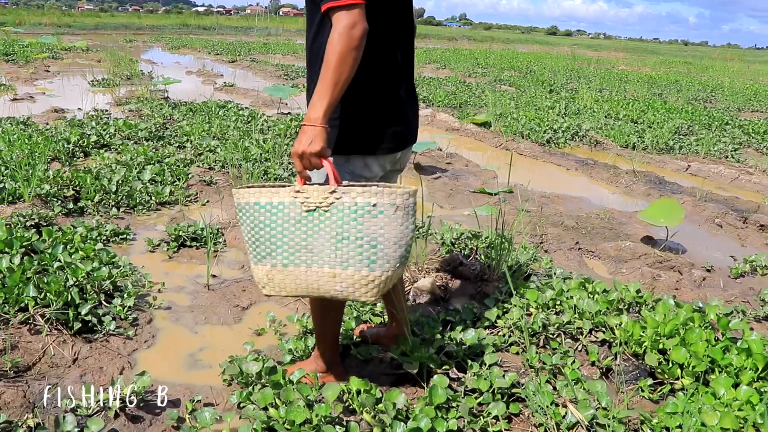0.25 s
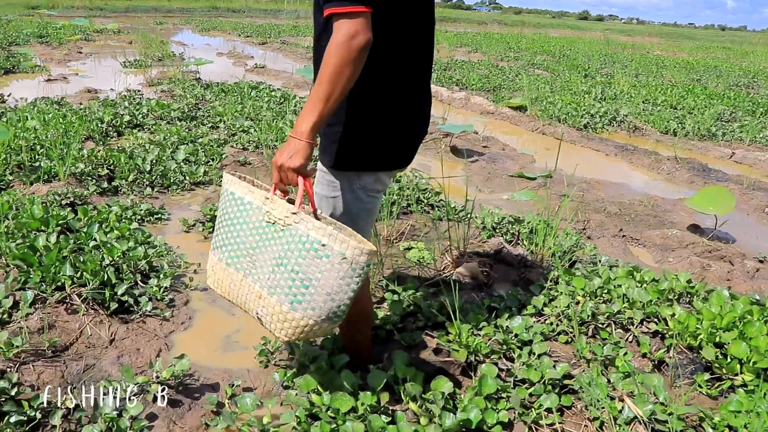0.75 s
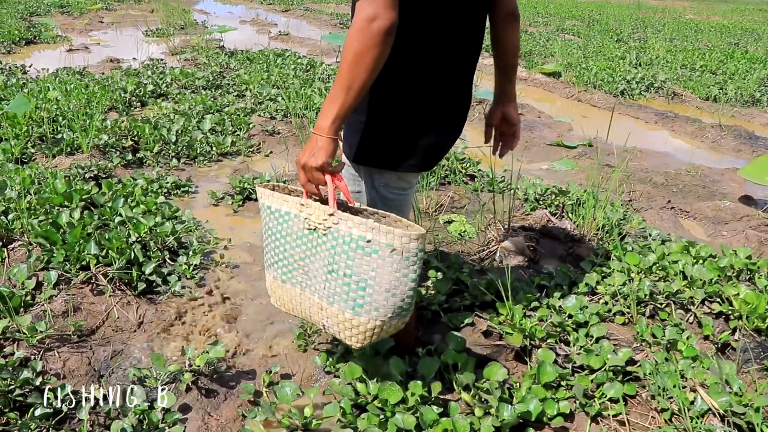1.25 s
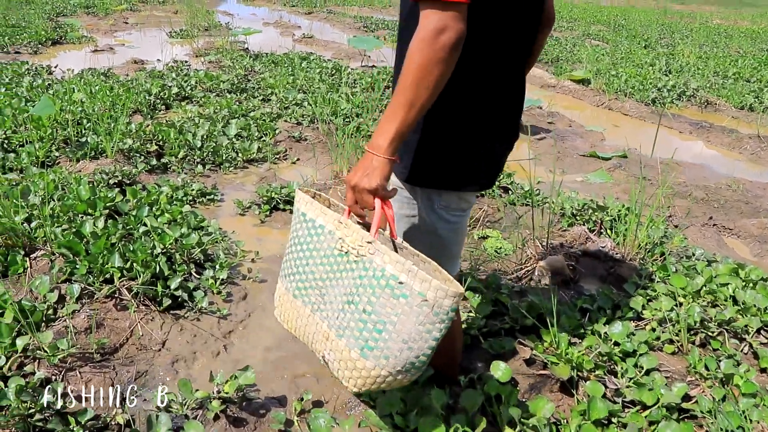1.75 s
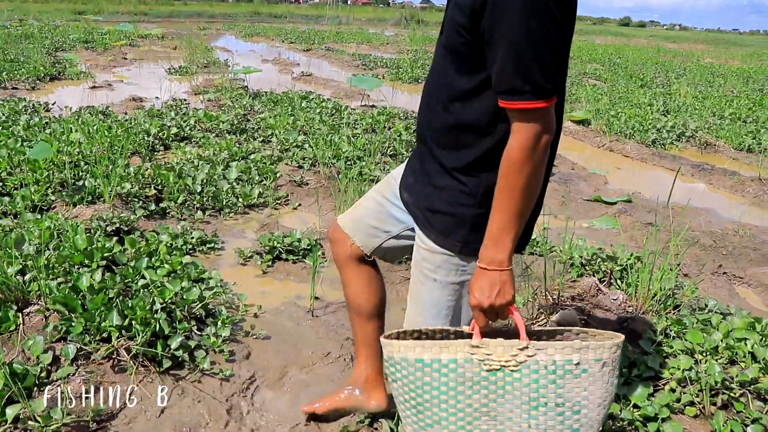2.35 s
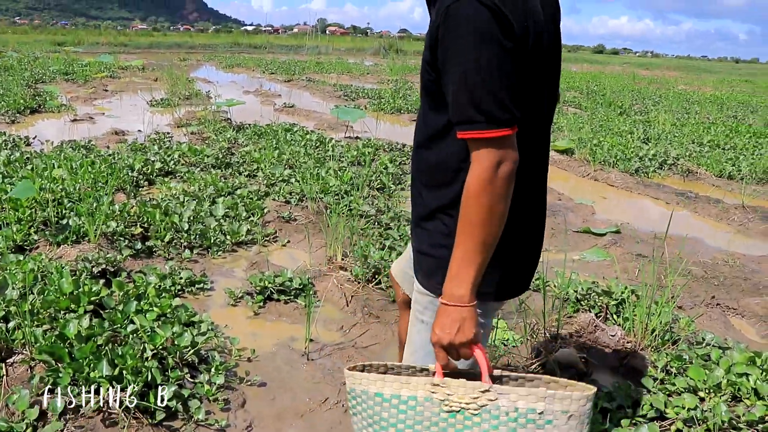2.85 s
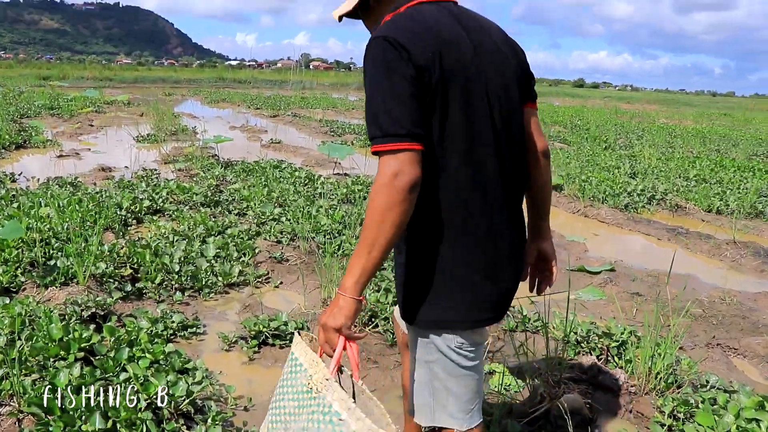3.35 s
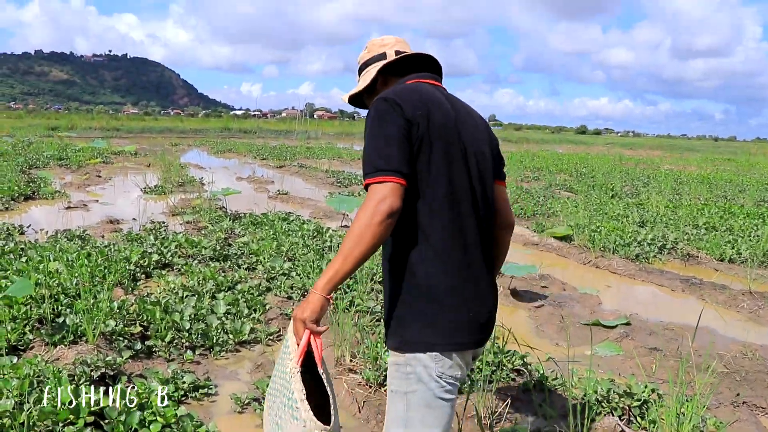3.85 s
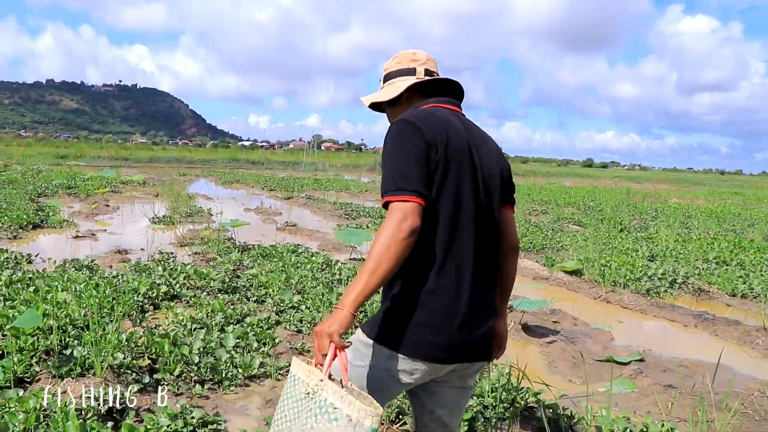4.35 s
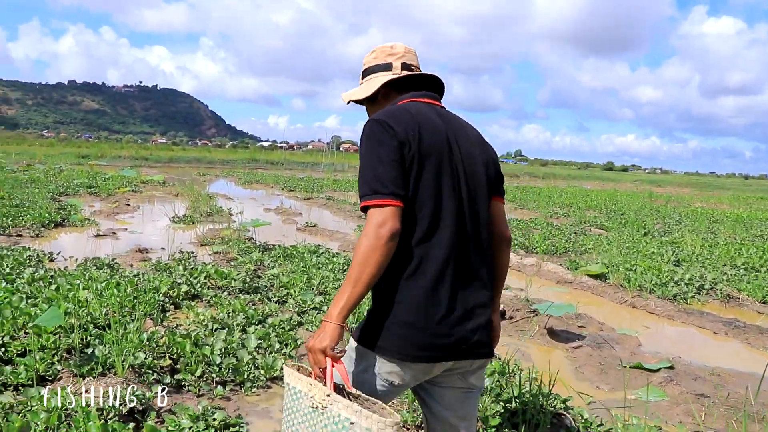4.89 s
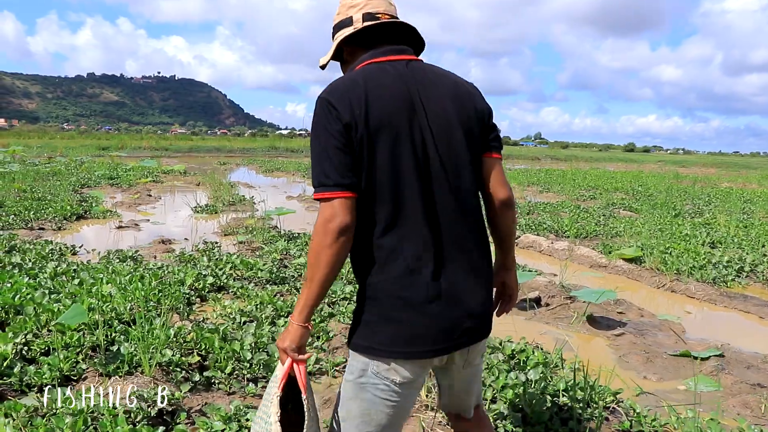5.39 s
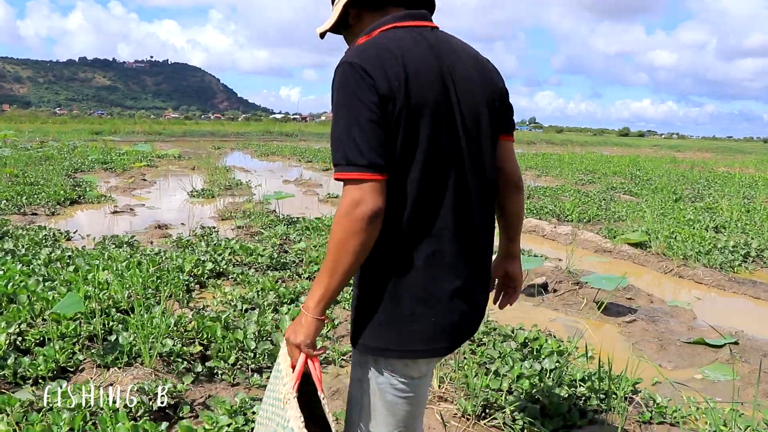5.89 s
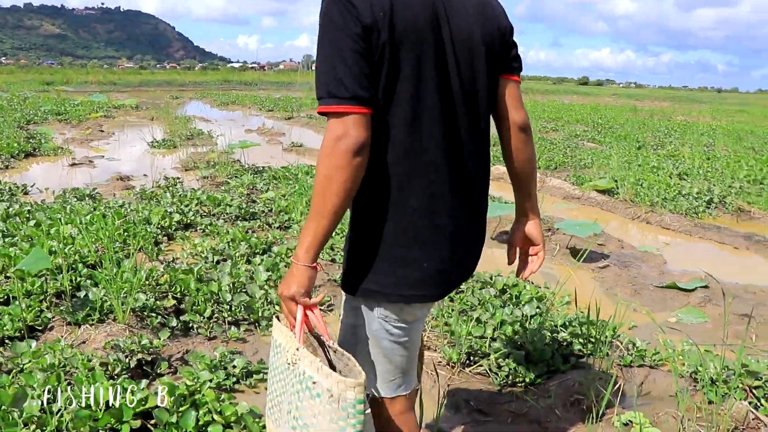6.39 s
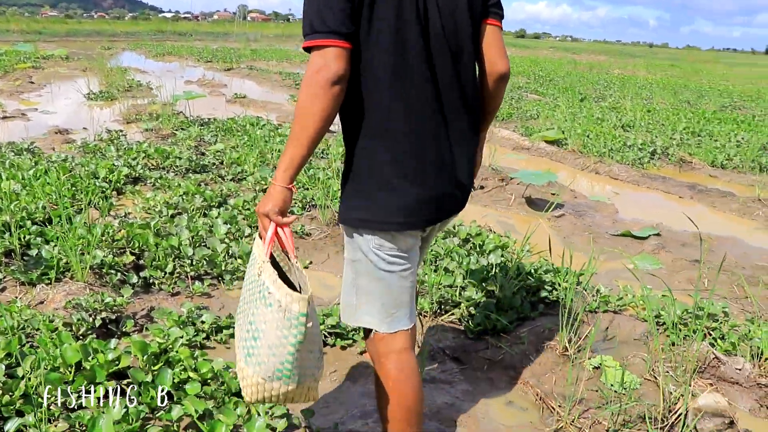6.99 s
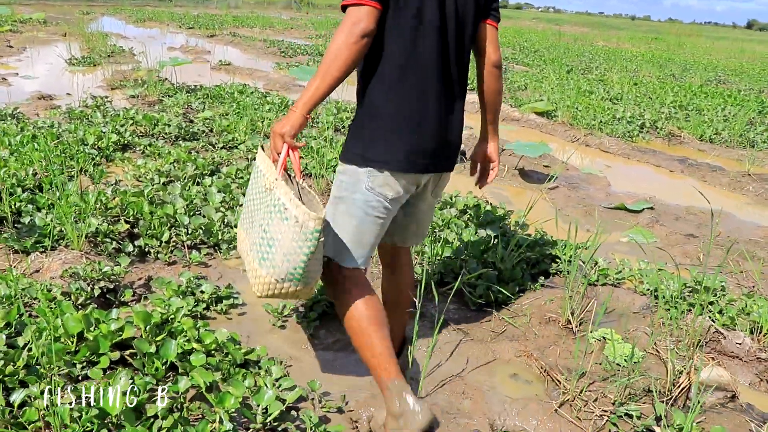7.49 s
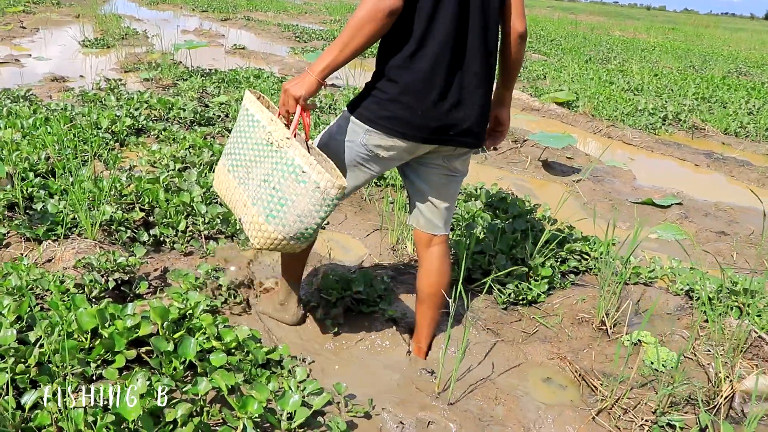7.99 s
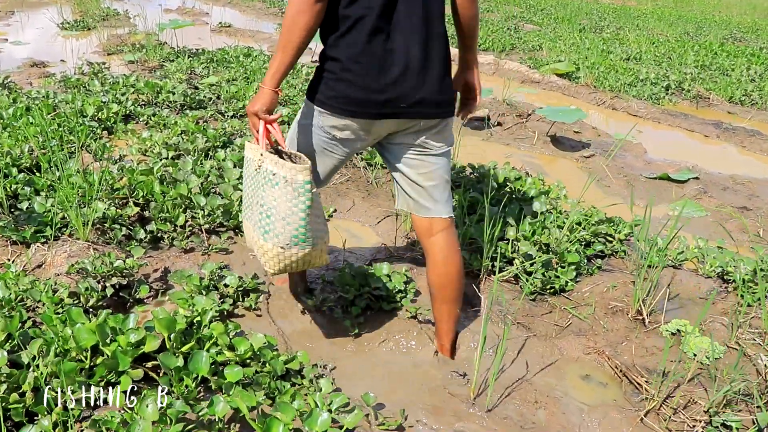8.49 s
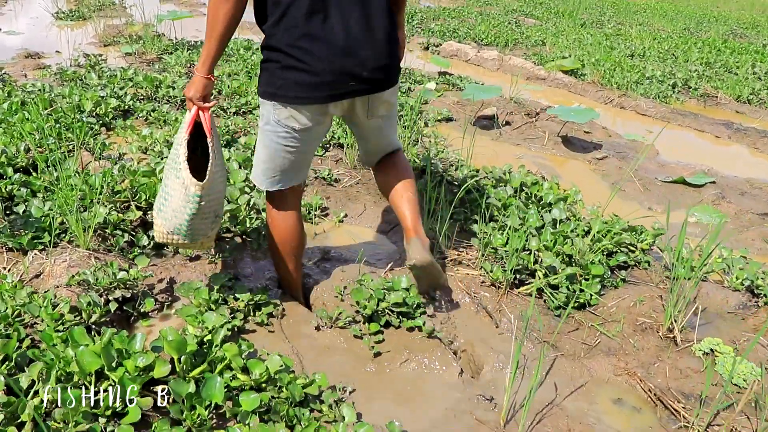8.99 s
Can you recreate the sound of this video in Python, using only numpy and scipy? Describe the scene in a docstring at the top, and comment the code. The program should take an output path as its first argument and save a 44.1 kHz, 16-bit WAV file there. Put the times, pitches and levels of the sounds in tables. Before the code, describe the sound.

In an open field, two far engines give a faint low hum while, near the microphone, someone steps barefoot through mud and puddles. The irregular steps splash, gurgle and pop, and drops and leaves tick. The steps ease off briefly and return with a sharp wet pop. Later a foot pulls out of a deep hole with a rasping suck, again two seconds after, and the sloshing continues.

```python
"""Two far engines hum over an open field while bare feet wade through mud and puddles near a hand-held
camera. From the start each stroke sloshes with swarms of small ringing bubbles, air pockets pop, and
leaves and spray tick. After a lull near 3 s comes a sharp pop. At 5.3 s and again at 7.4 s a foot tears
free of a deep hole, whose air column resonates with a rasp of inrushing air. Then the wading goes on."""
import sys
import numpy as np
from scipy import signal
from scipy.fft import rfft, irfft, next_fast_len
from scipy.io import wavfile
from scipy.ndimage import uniform_filter1d, map_coordinates

SR = 44100
rng = np.random.default_rng(int(sys.argv[2]) if len(sys.argv) > 2 else 0)


def wrap_up_sound(samples):
    """Save the sound to the file named by the first command line argument, as 16-bit audio."""
    columns = np.atleast_2d(samples).T
    # keep every value between -1 and 1, then stretch to whole-number steps
    tamed = np.clip(columns, -1, 1)
    steps = np.round(tamed * 32767).astype(np.int16)
    wavfile.write(sys.argv[1], SR, steps)


N = 407484


def amp(db):
    """Decibels to amplitude ratio."""
    return 10 ** (np.asarray(db) / 20)


def unit(x):
    """Normalisation to rms 1."""
    return x / np.sqrt(np.mean(x ** 2) + 1e-20)


def along(points, hz):
    """Interpolation of (frequency, value) points on a log axis."""
    f, v = np.transpose(points)
    return np.interp(np.log(hz + 1), np.log(f + 1), v)


def wobble(rate):
    """Smooth random modulation, rate knots a second."""
    knots = rng.standard_normal(int(N * rate / SR) + 4)
    return map_coordinates(knots, [np.arange(N) * rate / SR])


def filtered(x, response):
    """Linear filtering by a complex frequency response."""
    n = x.shape[-1]
    m = next_fast_len(n + SR // 4)
    return irfft(rfft(x, m) * response(np.fft.rfftfreq(m, 1 / SR)), m)[..., :n]


def impulses(s, db):
    """An impulse train at times s."""
    return np.bincount(np.round(s * SR).astype(int), amp(db), N)[:N]


def decays(s, db, t60_s):
    """Exponential decay: an envelope falling from each onset."""
    return signal.fftconvolve(impulses(s, db), amp(-60 * np.arange(2048) / SR / t60_s))[:N]


def bubbles(s, db, hz, cycles, rise, size):
    """Damped oscillation: each sine starts softly and climbs in pitch as its cavity shrinks."""
    t = np.arange(size) / SR
    turns = t * hz[:, None]
    age = turns / np.maximum(cycles, .3)[:, None]
    envelope = amp(db)[:, None] * np.e * 2 * age * np.exp(-2 * age)
    wave = envelope * np.sin(2 * np.pi * turns * (1 + rise * age / 2))
    at = np.round(s * SR).astype(int)[:, None] + np.arange(size)
    return np.bincount(at.ravel(), wave.ravel(), N + size)[:N]


def swarm(count, mid_hz, spread, cycles, scatter_db, size, rise=0.066):
    """Superposition of random bubbles, log-normal in pitch, amplitude and life; rms 1."""
    s = rng.random(count) * (N - 1) / SR
    pitch, life, strength = rng.standard_normal((3, count))
    hz = np.clip(mid_hz * np.exp(spread * pitch), 100, SR / 3)
    db = scatter_db * np.clip(strength, -2, 2)
    return unit(bubbles(s, db, hz, cycles * np.exp(0.354 * life), rise, size))


# Near noise at the two microphone ports: (frequency [Hz], shared power [ratio])
NEAR_COHERENCE = [(200, .98), (1000, .86), (2500, .6), (5000, .3), (10000, .1)]
def rush(spectrum):
    """Partial coherence: turbulence over a wide patch is only partly common to both ports; rms 1."""
    def response(hz):
        shared = np.clip(along(NEAR_COHERENCE, hz), 0, 1)
        return amp(along(spectrum, hz)) * np.sqrt([shared, 1 - shared, 1 - shared])
    common, left, right = filtered(rng.standard_normal((3, N)), response)
    return unit(common + np.array([left, right]))


# Ambient spectrum: (frequency [Hz], relative density [dB])
FIELD_SPECTRUM = [(15, -46), (25, -20), (36, -10), (49, -5), (74, 1), (141, -3.5), (217, -11.5),
                  (840, -16.5), (1290, -15), (1840, -22.5), (2840, -22.5), (5000, -38), (9320, -31),
                  (13600, -38), (14800, -56), (16000, -79)]
# Likeness of left and right: (frequency [Hz], correlation [ratio])
FIELD_COHERENCE = [(25, 0.9), (60, 0.88), (130, 0.86), (290, 0.22), (640, 0.0018), (1410, 0), (3100, 0),
                   (6820, 0), (15000, 0.0)]
FAR_BALANCE_DB = [[-.8], [.8]]  # left, right
def field(level_db=-52.5):
    """A diffuse field: far rumble and air, coherent between the ports only in the bass."""
    def response(hz):
        angle = np.arccos(np.clip(along(FIELD_COHERENCE, hz), -1, 1)) / 2
        return amp(along(FIELD_SPECTRUM, hz)) * [np.cos(angle), np.sin(angle)]
    noise = rng.standard_normal((2, N)) * amp(0.23 * wobble(1.1))
    mid, side = filtered(noise, response)
    return amp(level_db) * unit(np.array([mid + side, mid - side])) * amp(FAR_BALANCE_DB)


# Two far engines: (time [s], firing rate [Hz], relative level [dB])
PUMP_FIRING = [(0.0, 62.4, -54.5), (5.6, 62.63, -52), (6.5, 66.36, -55.5), (9.24, 64.9, -53)]
TRACTOR_FIRING = [(0.0, 104.3, -75), (0.62, 98.6, -63), (2.37, 93.6, -56), (2.981, 80.3, -54),
                  (3.73, 75.9, -58), (4.4, 78.2, -53), (4.71, 70.2, -58), (6.31, 93, -63),
                  (7.49, 76.8, -57), (8.29, 79.1, -59), (9.24, 76.25, -68)]
def engines():
    """Periodic firing: each engine gives an unsteady fundamental and a weak, blurred second harmonic."""
    out = 0
    for rows in (PUMP_FIRING, TRACTOR_FIRING):
        s, *columns = np.transpose(rows)
        hz, db = [np.interp(np.arange(N) / SR, s, c) for c in columns]
        phase = 2 * np.pi * np.cumsum(hz * (1 + 0.0041 * wobble(4))) / SR
        level = amp(db + 1.5 + 1.3 * wobble(5))
        second = amp(-10 + 5.3 * wobble(9.6)) * np.sin(2 * phase + 0.95 * wobble(9))
        out = out + level * (np.sin(phase) + second)
    return out * amp(FAR_BALANCE_DB)


# Spray and leaves: (frequency [Hz], relative density [dB])
SPRAY_SPECTRUM = [(2350, -4), (4000, 2.5), (4840, -6), (6700, 1), (11200, -2), (14800, -11), (16000, -57)]
def spray(split_hz=8500):
    """Impact noise: drops land all round, the low and high bands each in their own flurries."""
    drops = [swarm(3000, mid_hz=8440, spread=0.309, cycles=4.4, scatter_db=9.5, size=96)
             for port in range(2)]
    mist = unit(rush(SPRAY_SPECTRUM) + .5 * np.array(drops))
    fine = filtered(mist, lambda hz: 1 / (1 + (split_hz / (hz + 1)) ** 8))
    return sum(amp(3.3 * wobble(12) + 1.96 * wobble(55)) * band for band in (mist - fine, fine))


# Stems snapping and drops landing: (time [s], relative level [dB], frequency [Hz])
SNAPS = [(0.0343, -36, 7150), (0.1658, -28, 11100), (0.2947, -34, 8520), (0.414, -35, 8400),
         (0.8911, -30, 4510), (1.0655, -33.5, 4570), (1.275, -26, 6100), (1.7025, -41, 9040),
         (1.7268, -32.5, 9000), (1.902, -32.5, 4270), (2.393, -31, 13100), (2.8782, -31.5, 11100),
         (3.8268, -38, 4460), (5.0041, -34.5, 7400), (5.0875, -27.5, 9980), (5.2536, -23, 4300),
         (5.418, -34.5, 8240), (5.768, -27.5, 7550), (6.2747, -27.5, 4700), (6.3121, -30.5, 4760),
         (6.9152, -40, 5930), (7.075, -47, 13700), (7.379, -26, 8600), (7.416, -32, 10700),
         (7.4362, -23, 7400), (7.8448, -26.5, 7640), (7.8865, -22.5, 6900), (7.9835, -26, 8880),
         (8.1615, -31.5, 10300), (8.2616, -28, 9300), (8.7642, -30.5, 4610), (8.871, -22.5, 4220),
         (9.09, -34.5, 11200), (9.1575, -36, 7550)]
def ticks():
    """Broadband transients with a faint fizz; a difference in arrival time gives each a direction."""
    s, db, hz = np.transpose(SNAPS)
    lag = .00004 * rng.standard_normal(len(s))
    cycles = np.full_like(hz, 1.8)
    clicks = [bubbles(s + side * lag, db + 5.5, hz, cycles, rise=0.009, size=128) for side in (1, -1)]
    fizz = decays(s, db - 5, t60_s=0.021) * rush(SPRAY_SPECTRUM)
    return np.array(clicks) + fizz


# Thick mud: (frequency [Hz], relative density [dB])
MUD_SPECTRUM = [(100, -47), (200, -0.5), (400, -2), (700, 0.5), (1100, -26.5)]
def mud():
    """Large cavities resonate low: dull smacks over turbulent noise."""
    noise = rush(MUD_SPECTRUM)
    return noise + 0.59 * swarm(600, mid_hz=484.4, spread=0.339, cycles=4.3, scatter_db=1, size=1024)


# Churned water: (frequency [Hz], relative density [dB])
SLOSH_SPECTRUM = [(410, -73), (700, -7.5), (876, -9.5), (1010, -1.5), (1670, -3.5), (2380, 1.5),
                  (5060, -13), (6000, -17), (7800, -65), (13200, -120)]
def slosh():
    """Bubble resonance: small air bubbles ring briefly over turbulent noise."""
    noise = rush(SLOSH_SPECTRUM)
    return noise + 0.61 * swarm(4000, mid_hz=2102, spread=0.367, cycles=4.5, scatter_db=6.5, size=512)


def gurgle():
    """Lighter damping: these bubbles ring longer, raggedly, and climb further in pitch."""
    rings = swarm(600, mid_hz=1595, spread=.45, cycles=6.9, scatter_db=3, size=512, rise=0.213)
    return rings * (1 + 0.32 * wobble(900))


# Foot strokes: (peak time [s], rise [s], fall [s], slosh level [dB], mud level [dB], spray level [dB])
FOOT_STROKES = [(0.061, 0.23, 0.36, -45, -56, -44), (0.29, 0.09, 0.45, -56, -59, -48),
                (0.57, 0.25, 0.43, -45, -53, -40.5), (0.73, 0.13, 0.13, -45.5, -66, -54),
                (0.96, 0.19, 0.22, -38, -50.5, -48.5), (1.165, 0.014, 0.13, -37, -56, -42),
                (1.264, 0.1, 0.12, -29, -55, -31), (1.72, 0.21, 0.09, -55.5, -53, -49.5),
                (1.93, 0.15, 0.21, -45.5, -72, -41), (2.16, 0.42, 0.35, -45.5, -62, -36.5),
                (2.285, 0.057, 0.095, -25.5, -43, -38), (2.325, .03, 0.056, -32.5, -55, -45),
                (2.44, 0.44, 0.37, -42.5, -66, -45), (2.63, 0.057, .17, -43.5, -72, -51),
                (2.89, 0.061, 0.11, -57, -64, -54), (3.28, 0.034, .2, -95, -78, -60),
                (3.71, 0.28, 0.46, -49, -52.5, -58), (3.882, 0.034, 0.043, -35.5, -40.5, -45),
                (4.1, 0.12, 0.27, -46.5, -49, -52.5), (4.41, .1, 0.12, -73, -56, -52),
                (4.57, 0.031, 0.16, -59, -72, -44.5), (4.68, 0.12, 0.39, -48.5, -59, -47),
                (4.94, 0.3, 0.07, -74, -65, -49.5), (5.1, 0.12, 0.29, -60, -55.5, -48),
                (5.429, 0.11, 0.14, -41, -45, -45.5), (5.79, 0.039, 0.63, -49, -58, -42),
                (5.99, 0.16, .12, -47, -47.5, -64), (6.191, 0.21, .22, -32.5, -45, -36),
                (6.46, .1, .13, -45, -69, -45.5), (6.59, 0.064, 0.42, -45.5, -75, -43.5),
                (6.93, 0.089, 0.054, -56, -60, -49), (7.18, 0.071, 0.21, -55, -62, -42.5),
                (7.382, .07, 0.058, -36.5, -40.5, -39.5), (7.555, .03, 0.73, -46.5, -52.5, -46.5),
                (7.901, 0.052, 0.28, -38.5, -74, -35), (8.03, 0.17, 0.18, -43, -65, -42.5),
                (8.22, 0.21, 0.39, -48.5, -62, -46), (8.659, .12, 0.19, -48.5, -51, -44.5),
                (8.872, 0.13, 0.17, -42, -50.5, -45), (9.1, 0.6, 1, -63, -62, -49)]
# Constant seepage: (slosh level [dB], mud level [dB], spray level [dB])
SEEPAGE = [-67.5, -66, -57]
def stroke_gains(swell_db=21, roundness=0.87, step=64):
    """Incoherent sources add in power: each stroke swells and dies away over the seepage."""
    t = np.arange(0, N + step, step) / SR
    s, rise, fall, *top_db = np.transpose(FOOT_STROKES)
    after = t - s[:, None]
    away = np.abs(after) / np.where(after < 0, rise[:, None], fall[:, None])
    swell = amp(-swell_db * away ** roundness)
    power = amp(top_db) ** 2 @ swell ** 2 + amp(SEEPAGE)[:, None] ** 2
    return [np.interp(np.arange(N) / SR, t, np.sqrt(p)) for p in power]


def wading():
    """Amplitude modulation: water, mud and spray follow the strokes and gust with the churning."""
    slosh_gain, mud_gain, spray_gain = stroke_gains()
    churn = amp(0.71 * wobble(30) + 1.64 * wobble(80) + 3.2 * wobble(220))
    return (slosh_gain * unit(churn * slosh())
            + amp(-16) * slosh_gain ** .8 * gurgle()
            + mud_gain * unit(churn * mud())
            + spray_gain * unit(churn ** .5 * spray()))


# Air pockets: (time [s], level [dB], frequency [Hz], life [cycles]); 2 cycles smack, 8 ring
AIR_POCKETS = [(0.063, -41, 2510, 2), (0.1008, -29, 3300, 3), (0.1655, -36, 1310, 2.2),
               (0.279, -38, 1450, 3), (0.413, -36.5, 3450, 3.6), (0.5451, -40, 320, 1.9),
               (0.7218, -33.5, 3150, 4.5), (0.89, -37.5, 275, 1.8), (0.891, -32.5, 2410, 7),
               (0.9033, -31, 1780, 6), (0.9384, -27.5, 2160, 6), (0.948, -29, 1370, 3.3),
               (0.9626, -34, 1140, 5), (0.969, -35.5, 754, 4), (0.995, -33, 1300, 6.6),
               (1.019, -36, 610, 5.3), (1.038, -34, 1360, 5.5), (1.0658, -32.5, 2650, 6.4),
               (1.164, -32.5, 1480, 6), (1.1907, -27, 2440, 4), (1.2249, -25, 2280, 7.8),
               (1.273, -22, 2560, 7.5), (1.2732, -22, 1320, 4.5), (1.2846, -18, 2470, 6.5),
               (1.2849, -22.5, 1180, 3.4), (1.3348, -34, 3100, 4.9), (1.9009, -27.5, 1340, 1.9),
               (1.993, -32, 2930, 5), (2.1684, -34.5, 1930, 7.5), (2.1872, -34, 1620, 7.4),
               (2.2263, -26, 373, 3.5), (2.254, -33, 385, 3), (2.273, -27, 1480, 5),
               (2.284, -21, 2390, 8.6), (2.3008, -24.5, 1810, 6.5), (2.3212, -21.5, 1060, 3.7),
               (2.331, -24, 1370, 4), (2.3645, -30.5, 1430, 4.5), (2.425, -36, 2200, 6.5),
               (2.6078, -32, 1880, 7.7), (2.9312, -43, 2260, 6.4), (3.5449, -41.5, 578, 3.9),
               (3.6431, -33.5, 2720, 3.5), (3.714, -35.5, 2370, 7.6), (3.7592, -35, 2900, 2),
               (3.7687, -32, 3550, 2.1), (3.774, -35, 3800, 2.5), (3.8767, -14, 2110, 1.8),
               (3.8814, -37.5, 342, 3.2), (3.8812, -16.5, 1535, 5.4), (3.882, -21, 2500, 6.7),
               (3.898, -37, 1240, 3.5), (3.97, -44, 710, 3.7), (4.0675, -41.5, 1320, 5.6),
               (4.1082, -41.5, 1310, 8), (4.135, -43, 2600, 6), (4.165, -44, 1190, 9.2),
               (4.232, -41, 1200, 4.5), (4.305, -44.5, 1094, 4), (4.37, -49, 1230, 5.1),
               (4.647, -34.5, 2560, 3), (4.672, -36, 1190, 4.5), (4.692, -39.5, 1230, 3.3),
               (4.743, -37, 2520, 11), (4.8444, -40.5, 2070, 7), (5.2627, -23.5, 4030, 14),
               (5.417, -23.5, 1140, 4.5), (5.4278, -32, 359, 3.7), (5.431, -30, 1300, 3),
               (5.5756, -39.5, 663, 3.2), (5.7721, -25, 3130, 5.8), (5.8815, -35.5, 3500, 6.3),
               (5.968, -42, 1560, 7), (6.005, -40, 730, 4), (6.1186, -26.5, 1710, 4.6),
               (6.139, -37, 2810, 6), (6.195, -31, 3500, 5.5), (6.204, -22, 1000, 4.2),
               (6.28, -41, 900, 3.9), (6.417, -45.5, 1060, 3.7), (6.4278, -40.5, 4070, 12),
               (6.4657, -27.5, 2340, 3), (6.514, -30, 2850, 3.9), (6.527, -36, 1660, 3.8),
               (6.5726, -38, 1070, 3), (6.585, -31, 4020, 3.2), (7.372, -25, 2560, 2.2),
               (7.3781, -24.5, 1500, 1.8), (7.3832, -22, 2780, 4), (7.548, -38, 2430, 6),
               (7.574, -34.5, 1080, 12), (7.6006, -33.5, 1020, 6.4), (7.8443, -37, 1240, 2.8),
               (7.8862, -24, 1700, 1.8), (7.918, -34, 2560, 6), (7.966, -34, 650, 2.8),
               (8.1131, -38, 2150, 8), (8.209, -37, 2800, 5), (8.2435, -28, 2840, 2.8),
               (8.2434, -33.5, 710, 2.2), (8.6628, -28.5, 1390, 3.7), (8.7633, -24.5, 3000, 2.3),
               (8.872, -24, 430, 2.05), (8.8743, -22.5, 967, 4.5), (8.876, -22, 2880, 2.7),
               (9.2034, -37, 1690, 4.9)]
def pops(deep_hz=800, climb_hz_per_s=26400):
    """Cavity resonance: deep pockets gulp; small ones crack, splat and ring raggedly as bubbles."""
    s, db, hz, cycles = np.transpose([row for row in AIR_POCKETS if row[2] < deep_hz])
    gulp = bubbles(s, db, hz, cycles, rise=0.083, size=1536)
    s, db, hz, cycles = np.transpose([row for row in AIR_POCKETS if row[2] >= deep_hz])
    climb = (climb_hz_per_s * cycles / hz ** 2)[:, None]
    ring = bubbles(s, db, hz, cycles, climb, size=1024) * (1 + 0.5 * wobble(1100))
    crack = bubbles(s, db - 6.5, 0.95 * hz, np.full_like(hz, 1.2), rise=.03, size=128)
    wet_noise = unit(filtered(rng.standard_normal(N), lambda f: amp(along(SLOSH_SPECTRUM, f))))
    splat = decays(s, db - 12.5, t60_s=0.041) * wet_noise
    return gulp + ring + crack + splat


def air_column(drive, modes, pitch, fade_db):
    """Modal resonance of a hole; soft mud walls absorb fade_db per octave above 900 Hz."""
    def mode(f, hz, width, db):
        gain = amp(db - fade_db * np.log2(max(hz / 900, 1)))
        return gain * 1j * f * width / ((hz * pitch) ** 2 - f * f + 1j * f * width)
    return filtered(drive, lambda f: sum(mode(f, *row) for row in modes))


# A foot pulled free: (start [s], end [s], rasp level [dB], attack [s], release [s],
# initial hiss re rasp [dB], last over first pitch [ratio])
FOOT_PULLS = [(5.253, 5.364, -25, 0.029, 0.0096, -4.5, 1.057), (7.435, 7.553, -23.5, .003, 0.044, -4, 0.92)]
# Modes of each hole: (frequency [Hz], bandwidth [Hz], gain [dB])
HOLE_MODES = [
    [(175, 73, -12), (316, 180, -9.5), (664, 67, 3), (1760, 150, -6.5), (2550, 110, -4.5), (3450, 110, -13),
     (4150, 120, -22)],
    [(167, 53, -1), (305, 63, -5.5), (880, 640, -2), (1850, 160, 4.5), (2700, 180, 1), (3280, 41, -22),
     (4520, 110, -29)],
]
# The mud seal slapping shut: (time [s], drive level [dB])
SEAL_SLAPS = [(5.274, 22.5), (5.2965, 23.5), (5.3158, 19), (5.3278, 22.5), (5.3464, 15), (5.3524, 16.5),
              (7.4401, 6), (7.4596, 8), (7.4794, 7), (7.4917, 14)]
# Air at the seal: (frequency [Hz], relative density [dB])
HISS_SPECTRUM = [(2500, -30), (4400, -3), (4840, -5), (6700, -1), (11200, -5), (14800, -16), (16000, -55)]
def pulls(start_db=8, end_db=12, hiss_fade_db=16):
    """Forced resonance: air tears in past the heel, and the flapping, slapping seal rings the hole."""
    out = np.zeros((2, N))
    flap = amp(1.14 * wobble(160))
    crackle = 1 + 4 * (rng.random(N) < .006)
    tear = flap * crackle * rush([(60, -10), (130, 4), (4200, 2.5), (6000, -10), (16000, -39)])
    hiss = unit(flap * rush(HISS_SPECTRUM))
    slaps = impulses(*np.transpose(SEAL_SLAPS))
    slaps = uniform_filter1d(uniform_filter1d(slaps, size=9), size=9)
    for (start, end, db, attack, release, hiss_db, slide), modes in zip(FOOT_PULLS, HOLE_MODES):
        span = slice(round(start * SR) - SR // 100, round(end * SR) + SR // 10)
        t = np.arange(N)[span] / SR
        done = np.clip((t - start) / (end - start), 0, 1)
        onset_db = start_db * np.clip(1 - (t - start) / attack, 0, 1)
        offset_db = end_db * np.clip(1 - (end - t) / release, 0, 1)
        gate = uniform_filter1d(1. * (done > 0) * (done < 1), size=60)
        level = gate * amp(db - onset_db - offset_db)
        drive = np.vstack([level * tear[:, span], slaps[span]])  # left air, right air, slaps
        # The pitch shifts as the foot leaves: a crossfade between two tunings.
        early = air_column(np.cos(done * np.pi / 2) * drive, modes, slide ** -.5, fade_db=0)
        late = air_column(np.sin(done * np.pi / 2) * drive, modes, slide ** .5, fade_db=7)
        rung = early + late
        rasp = unit(rung[:2]) * np.sqrt(np.mean(level ** 2))
        leak = level * amp(hiss_db - hiss_fade_db * done) * hiss[:, span]
        out[:, span] += rasp + rung[2] + leak
    return out


# Shadow of the camera body: (frequency [Hz], left minus right level [dB])
PORT_LEVEL = [(60, 28), (110, -8), (200, -0.5), (380, -2.5), (700, -3.5), (1290, -2), (2380, -9),
              (4400, -7), (8120, -4.5), (15000, -7)]
# Phase between the ports: (frequency [Hz], left lead [rad])
PORT_PHASE = [(300, 0), (1600, -.3), (2400, -.9), (3000, 0), (4000, .5), (4700, 0)]
def ports(near):
    """Acoustic shadowing: the camera body makes a near sound differ in level and phase at its ports."""
    side = np.array([[.5], [-.5]])
    return filtered(near, lambda hz: amp(side * along(PORT_LEVEL, hz))
                    * np.exp(1j * side * along(PORT_PHASE, hz)))


def scene():
    """Superposition of the near and far sources at the two ports."""
    return ports(wading() + pops() + ticks() + pulls()) + engines() + field()


def record(dry):
    """Band limiting: the camera keeps nothing above 16.3 kHz."""
    return filtered(dry, lambda hz: hz < 16300)


dry = scene()
out = record(dry)
wrap_up_sound(out)
```